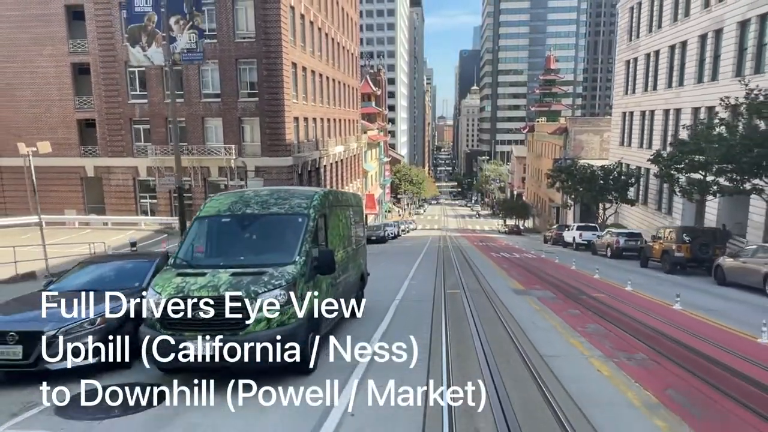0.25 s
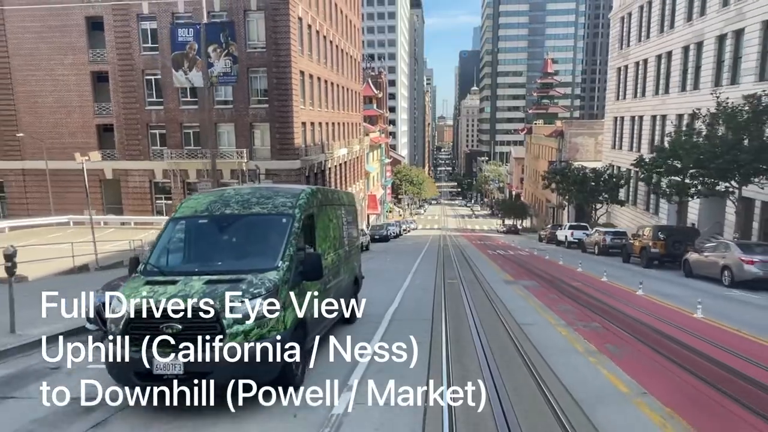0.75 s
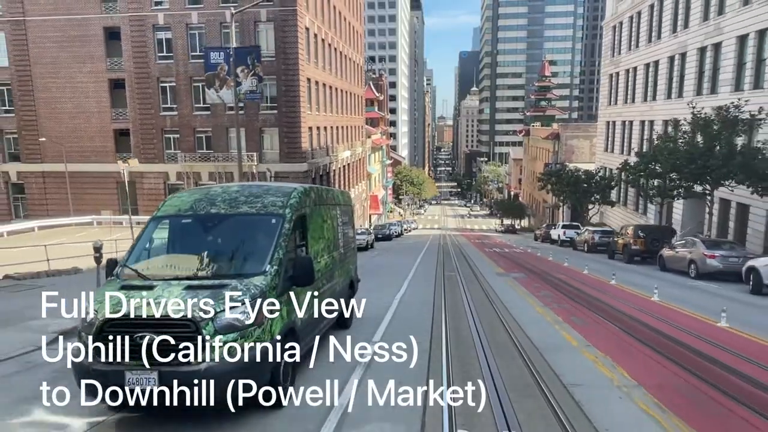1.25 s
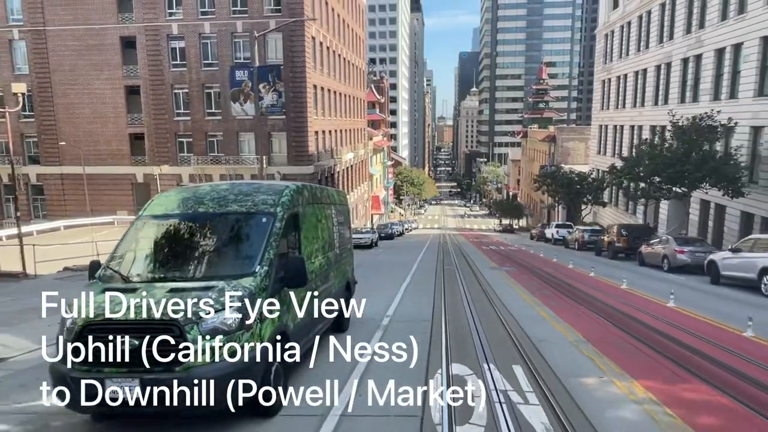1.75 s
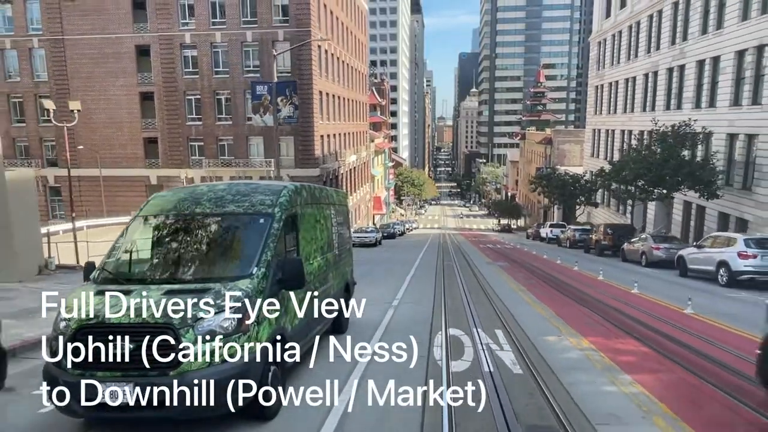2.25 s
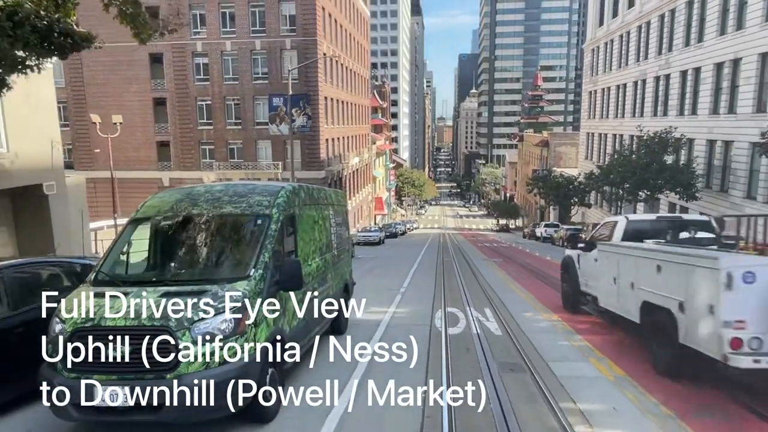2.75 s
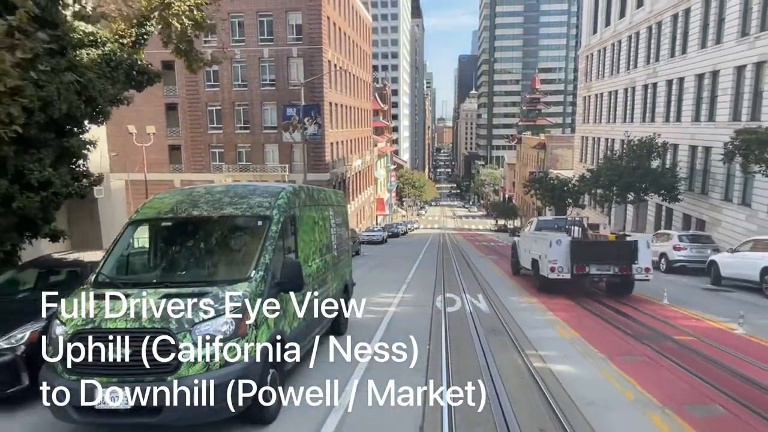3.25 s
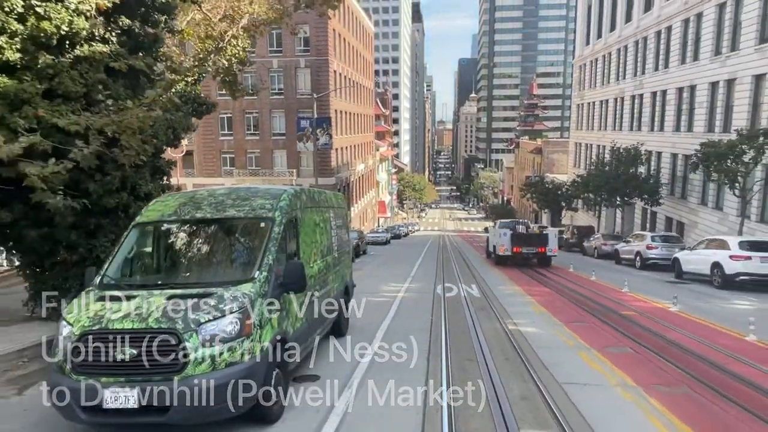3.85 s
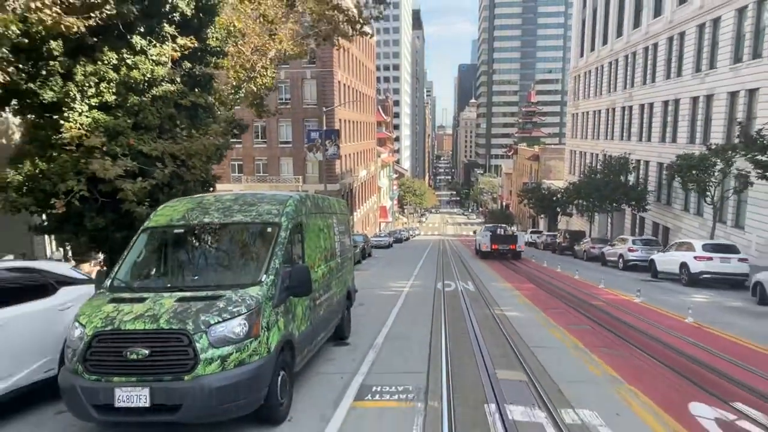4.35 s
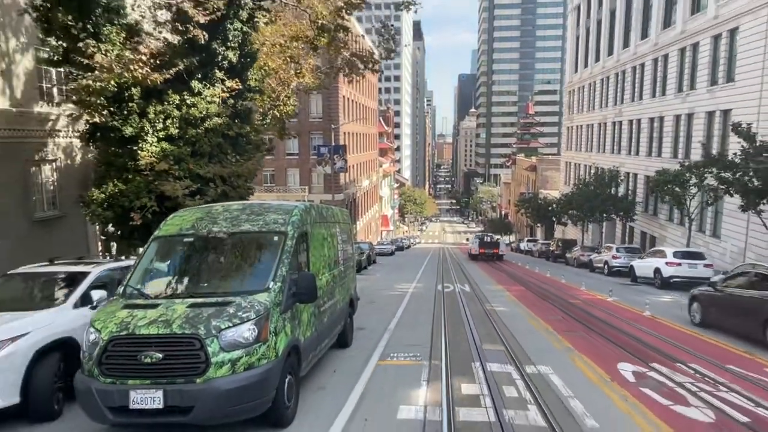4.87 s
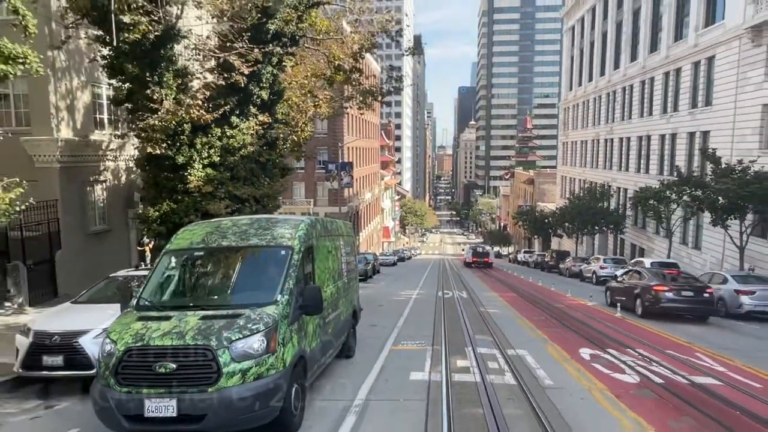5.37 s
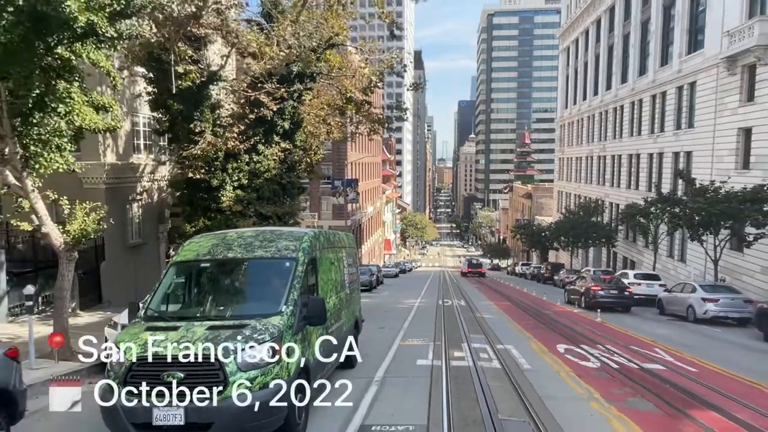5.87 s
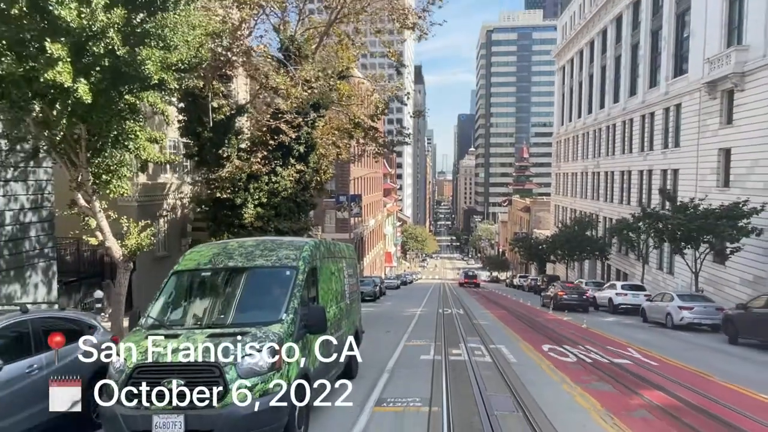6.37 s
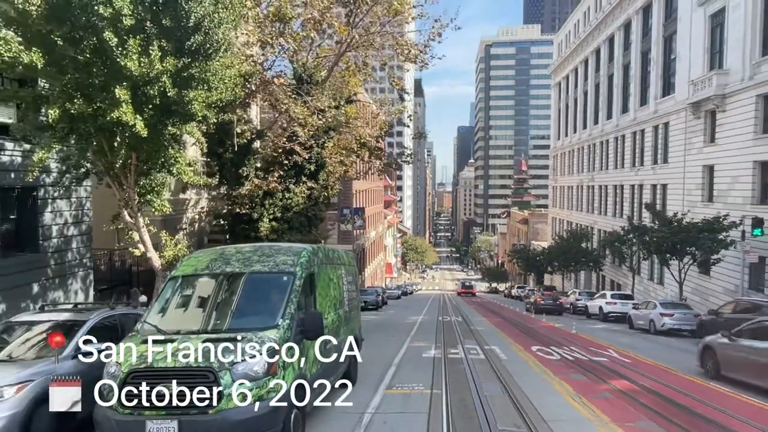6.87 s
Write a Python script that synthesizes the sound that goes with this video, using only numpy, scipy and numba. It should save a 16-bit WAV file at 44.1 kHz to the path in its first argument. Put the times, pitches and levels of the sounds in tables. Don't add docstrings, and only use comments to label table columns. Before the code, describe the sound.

Steel wheels hum and throb under a wooden rail car on a city street, wide stereo and close to the microphone. Deep rumble, rough midrange roar and hissing cable grind run continuously beneath jolting clanks. After a short low engine note, paired rail joints crash with ringing metal, first near the middle, then twice more. Finally the hum drops away, leaving dull booming, faint flange whine and a fade.

```python
import sys
import numpy as np
from scipy import signal
from scipy.fft import rfft, irfft
from scipy.io import wavfile
from scipy.ndimage import uniform_filter1d
from numba import njit

SR = 44100
rng = np.random.default_rng(int(sys.argv[2]) if len(sys.argv) > 2 else 0)


def int16_out(signal):
    q = np.round(np.clip(np.atleast_2d(signal).T, -1, 1) * 32767)
    wavfile.write(sys.argv[1], SR, q.astype(np.int16))


def voltage_ratio(level):
    return 10 ** (np.asarray(level, float) / 20)


N = 313992
T = np.arange(N) / SR

# time_s, drone_level_db, roughness_db
WHEEL_ON_RAIL = [(0, -6, -24), (0.08, -18.5, -31.5), (0.15, -11.5, -28.5), (0.36, -17, -25.5),
                 (0.61, -15, -24), (0.95, -19.5, -25.5), (1.5, -16.5, -23), (1.66, -16, -27.5),
                 (2.22, -19, -28.5), (2.42, -20, -26.5), (3.55, -16.5, -29), (3.98, -19, -25),
                 (4.26, -13, -35), (4.44, -22.5, -31), (4.6, -13, -35), (5.17, -21.5, -41.5),
                 (5.4, -20, -31), (7.12, -42, -40.5)]
# time_s, pitch_hz
DRONE_PITCH = [(0, 248), (0.7, 243), (1.0, 225), (1.4, 232), (1.8, 248), (2.4, 243), (2.8, 234), (3.2, 241),
               (3.8, 234), (4.9, 250), (5.25, 248), (5.6, 231), (7.12, 232)]
# time_s, pitch_hz, width_hz
BOOM_PITCH = [(0, 180.4, 103), (3.5, 164, 91.5), (4.3, 163.6, 60), (5.1, 148.7, 68.8), (5.4, 152, 40.8),
              (5.9, 176.5, 60), (6.5, 153.6, 35.9), (7.12, 152.3, 29.95)]
# time_s, pitch_hz, width_hz
FRAME_PITCH = [(0, 414.6, 87), (2.5, 400.6, 98.4), (5, 413, 126.4), (5.6, 353, 171), (7.12, 323, 164.4)]
# pitch_hz, level_db_per_hz
SUB_COLOUR = [(12, -52.5), (20, -25), (59, -2), (108, -2.5), (130, -6.5), (170, -26), (290, -120)]
# start_s, length_s, level_db, pitch_hz
DRONE_THROBS = [(-0.002, 0.023, -6, 244), (0.109, 0.064, -12, 251.7), (0.172, 0.082, -12.5, 229.4),
                (0.291, 0.041, -10, 220), (0.364, 0.1, -15, 248.6), (0.48, 0.06, -9, 252.7),
                (0.562, 0.11, -11, 249.4), (0.67, 0.09, -12.5, 239), (0.743, 0.029, -19, 277),
                (0.838, 0.055, -13.5, 239.5), (0.972, 0.04, -13, 215), (1.012, 0.092, -14, 226),
                (1.101, 0.049, -15, 233), (1.229, 0.029, -8.5, 235.7), (1.329, 0.072, -15.5, 225.2),
                (1.468, 0.044, -13.5, 251), (1.547, 0.036, -13.5, 228), (1.579, 0.24, -14.5, 250.1),
                (1.818, 0.097, -11, 250), (1.902, 0.088, -14, 260.6), (2.059, 0.058, -6.5, 244),
                (2.118, 0.027, -6.5, 230), (2.145, 0.102, -12, 245.1), (2.285, 0.031, -7.5, 234),
                (2.411, 0.05, -13.5, 233), (2.518, 0.052, -14.5, 228), (2.619, 0.04, -12.5, 254),
               (2.73, 0.051, -13, 229), (2.825, 0.038, -10.5, 223), (2.883, 0.037, -11, 236),
               (2.935, 0.065, -13.5, 240), (3.054, 0.06, -13.5, 226.5), (3.166, 0.049, -13.5, 235.6),
               (3.24, 0.064, -15, 249.4), (3.313, 0.015, -2.5, 231.4), (3.4, 0.016, -11.5, 234),
               (3.449, 0.048, -19, 245.3), (3.521, 0.033, -11.5, 213), (3.557, 0.048, -13, 222.4),
               (3.623, 0.027, -9.5, 256.7), (3.735, 0.036, -16, 208), (3.768, 0.033, -12, 222),
               (3.838, 0.064, -13.5, 234.5), (3.915, 0.027, -13, 227), (3.989, 0.014, -11.5, 234),
               (4.031, 0.022, -17.5, 229), (4.073, 0.027, -7, 233.6), (4.127, 0.06, -16, 241),
               (4.185, 0.16, -13, 244.2), (4.385, 0.046, -15, 259), (4.45, 0.04, -14, 228.3),
               (4.506, 0.184, -13, 245.4), (4.701, 0.018, -13.5, 250), (4.729, 0.028, -20.5, 259.3),
               (4.764, 0.069, -16, 252.3), (4.856, 0.06, -18.5, 260.3), (4.905, 0.09, -12, 251.6),
               (5.039, 0.05, -13.5, 249), (5.097, 0.066, -14.5, 243), (5.152, 0.07, -13, 250),
               (5.221, 0.032, -14.5, 243), (5.274, 0.032, -15, 253)]
# start_s, length_s, level_db, pitch_hz
FRAME_THROBS = [(0.248, 0.05, -16, 412), (0.614, 0.038, -14.5, 394), (3.989, 0.042, -16, 405)]
SLOWING_THROBS = [(5.448, 0.05, -19, 218.6), (5.542, 0.1, -24, 208), (5.64, 0.023, -22, 242),
                  (5.68, 0.039, -17.5, 229), (5.806, 0.026, -17.5, 191), (5.851, 0.062, -18, 214),
                  (5.918, 0.055, -21, 210), (5.943, 0.081, -25.5, 215.6)]
BOOM_THROBS = [(0.417, 0.025, -22, 151), (0.828, .09, -20.5, 141.7), (1.068, 0.11, -19, 184.6),
               (1.531, .05, -17, 133.3), (1.906, 0.065, -19, 135), (3.638, 0.032, -20.5, 152),
               (3.676, .09, -19.5, 169), (3.887, 0.04, -18, 124), (5.254, .085, -22.5, 139.5),
               (5.434, 0.027, -25, 150.4), (5.647, 0.059, -20.5, 149.6), (5.845, .045, -23.5, 178),
               (5.907, 0.077, -23.5, 163.8), (5.998, 0.04, -16.5, 162.2), (6.086, .085, -18.5, 172),
               (6.204, .14, -22, 156.6), (6.362, 0.029, -20.5, 169.6), (6.433, 0.15, -30, 141),
               (6.573, .045, -21, 157), (6.645, .055, -27, 156.4), (6.783, .075, -22, 149)]
# time_s, level_db
ROAR_SWELL = [(0.0, -29), (0.48, -28.5), (0.89, -34.5), (1.76, -29), (2.28, -30.5), (2.72, -30),
              (2.97, -30.5), (3.88, -32), (4.2, -31), (4.6, -32), (4.96, -33), (5.49, -37), (6.11, -37),
              (6.35, -41), (6.7, -42), (7.12, -43)]
# pitch_hz, level_db_per_hz
ROAR_COLOUR = [(150, -18.5), (260, -6.5), (315, -10), (402, -23.5), (457, -9.5), (560, -14.5), (778, -13.5),
               (866, -19), (943, -14), (1120, -21.5), (1660, -20.5), (2260, -28), (2800, -38.5),
               (3310, -45.5), (4300, -84), (7280, -120)]
GRIND_COLOUR = [(2600, 1), (3200, -5), (3700, -5), (4300, -7.5), (5000, -10.5), (5700, -12.5),
                (6400, -12.5), (7100, -19), (8200, -25), (9600, -22.5), (10500, -37), (12200, -45.5),
                (13500, -42), (15500, -44)]
# pitch_hz, width_hz, level_db
WHINE_NOTES = [(1386, 42, -4.5), (1750, 76, -0.5)]
# time_s, level_db
WHINE_LEVEL = [(0, -59.5), (5.5, -63.5), (5.9, -50), (6.2, -65), (6.35, -51.5), (6.8, -53.5), (6.87, -62),
               (6.95, -52), (7.12, -49)]
# pitch_hz, width_hz, level_db
GRIP_NOTES = [(2225, 170, 3), (5030, 90, -13), (6280, 540, -14), (11700, 700, -42)]
# time_s, level_db
GRIP_BITE = [(0, -54), (2.4, -52), (2.6, -44.5), (3, -48.5), (3.4, -44), (3.7, -47), (4.5, -54.5),
             (7.12, -71.5)]
# pitch_hz, width_hz, level_over_roar_db
PULLEY_NOTES = [(11900, 30, -56.5), (12245, 20, -52.5)]
# pitch_hz, level_db_per_hz
STREET_COLOUR = [(3000, -2.5), (6000, -1), (9000, 0.5), (12000, -9.5), (13000, -12), (13600, -5.5)]
# start_s, treble_db, mids_over_treble_db, thud_db
JOLTS = [(0.4, -32.5, -4, -30.5), (0.428, -23, 9.5, -11), (0.603, -31.5, 15, -34),
         (0.785, -28.5, 16, -10.5), (0.825, -31, 10, -25.5), (0.979, -41, 12.5, -20.5),
         (1.035, -34.5, 16, -28.5), (0.12, -45.5, 16, -33.5), (0.285, -45.5, 10.5, -32.5),
         (0.69, -33.5, 12.5, -28), (1.72, -40, 8.5, -29.5), (2.49, -37, 14, -38),
         (2.554, -35.5, 16.5, -33.5), (1.195, -28, 14.5, -18), (1.308, -34, -4, -17.5),
         (1.541, -28.5, 13, -10.5), (1.606, -28, 7, -19.5), (1.83, -29.5, 11.5, -31),
         (1.9036, -27.5, 15, -11), (1.957, -27, 5, -13), (2.09, -29, 9.5, -31.5), (2.191, -27.5, 12.5, -32),
         (2.343, -30, -6.5, -27.5), (3.1003, -33, 7.5, -40.5), (3.151, -33, 10.5, -29.5),
         (3.2185, -29, 10.5, -22), (3.468, -24, 11, -15), (3.5873, -24.5, 11.5, -10),
         (3.928, -28, 12, -10.5), (4.081, -35, 15, -25.5), (4.183, -34.5, 11.5, -16),
         (4.3, -42.5, 5, -20.5), (4.659, -39.5, 13, -28.5), (4.78, -49, 7.5, -21.5),
         (4.904, -24.5, 6.5, -14.5), (5.0788, -38.5, 7, -44), (5.2495, -37, 16, -15), (5.288, -37, 15, -18),
         (5.879, -47, 20.5, -27.5), (6.86, -56, 2.5, -21), (7.012, -38, 1.5, -30)]
# pitch_hz, level_db_per_hz
RATTLE_COLOUR = [(2600, 1.5), (3200, -3.5), (3700, -5.5), (4300, -9.5), (5000, -12.5), (5700, -11),
                 (6400, -9.5), (7100, -17), (8200, -20.5), (9600, -18.5), (10500, -31.5), (12200, -34.5),
                 (13500, -51), (15500, -38.5)]
# start_s, level_db, pitch_hz, t60_s
IRON_KNOCKS = [(1.2, -29, 2134, 0.13), (1.32, -28.5, 2050, 0.15), (4.08, -39, 5510, 0.053),
               (4.103, -41.5, 5040, .08), (4.377, -31.5, 2206, 0.12), (5.087, -33, 2140, 0.061),
               (4.272, -17, 468, 0.081), (4.984, -10, 468, 0.11), (2.75, -30.5, 4520, 0.086),
               (2.893, -32, 2080, 0.09), (5.868, -37.5, 1446, .12), (5.885, -33, 1465, 0.13),
               (5.995, -41, 1455, 0.086), (6.035, -35, 1420, 0.09), (6.132, -34, 1504, 0.071),
               (6.277, -34, 1520, 0.11), (6.972, -33.5, 1085, 0.11), (2.672, -24.5, 2830, .1),
               (2.726, -12.5, 1930, 0.099), (2.728, -17.5, 2994, 0.087), (2.731, -35, 4200, 0.082),
               (2.848, -23.5, 2736, 0.15), (2.847, -21.5, 2410, 0.12), (3.468, -20, 2130, 0.07),
               (4.197, -21, 2794, 0.1), (4.272, -26.5, 4150, .08), (4.275, -46.5, 14800, .5),
               (2.728, -54.5, 14650, .35), (4.987, -55, 14750, .4), (4.275, -17.5, 2760, 0.13),
               (4.99, -53, 15870, 0.28), (2.726, -58, 15530, .1), (4.265, -23.5, 2106, 0.17),
               (4.276, -36.5, 1960, 0.081), (4.409, -46, 7483, 0.21), (4.41, -47.5, 8500, .3),
               (4.91, -22, 2915, .12), (4.984, -20.5, 2090, 0.13), (4.986, -17.5, 2770, 0.085),
               (6.76, -57, 5170, 0.2)]
# start_s, level_db, pitch_hz
FITTING_TICKS = [(2.451, -37, 5060), (2.504, -36, 5230), (2.5714, -35, 5190), (2.6188, -38.5, 5030),
                 (2.6522, -32, 5160), (3.423, -35.5, 5100), (3.47, -29, 5030), (3.548, -35.5, 5070)]
# time_s, pitch_hz, level_db
TRUCK_NOTE = [
    (2.05, 65.6, -37),
    (2.112, 70, -28.5),
    (2.154, 72.2, -26),
    (2.292, 79.4, -23.5),
    (2.55, 82.4, -30.5),
]
# time_s, pitch_hz, level_db
SLIP_NOTE = [(2.43, 5200, -72), (2.5, 5110, -45.5), (2.67, 5140, -48), (2.74, 5120, -57), (2.95, 5030, -52),
             (3.2, 5150, -79), (3.45, 5040, -53), (3.62, 5040, -78)]
# start_s, treble_db, mids_over_treble_db, ring_over_treble_db, t60_s
RAIL_JOINTS = [(2.666, -28.5, 4, -19, 0.35), (2.7256, -13, 4, -18.5, 0.086),
               (2.843, -29.5, 11, -22.5, 0.15), (2.745, -25, 5.5, -22.5, 0.08),
               (2.865, -39.5, 9.5, -20, 0.27), (2.893, -39.5, 10, -25, 0.089), (4.192, -28, 4, -14.5, 0.28),
               (4.206, -27.5, 7.5, -19, 0.22), (4.2712, -13, 1.5, -4.5, 0.11),
               (4.305, -27, 6.5, -18.5, 0.09), (4.327, -33, 2, -19.5, .15), (4.887, -40, 8.5, -21, 0.11),
               (4.906, -25, 6.5, -10.5, 0.2), (4.983, -11.5, 1.5, -12.5, 0.11)]
# pitch_hz, level_db_per_hz
CRASH_MID_COLOUR = [(190, -36.5), (330, -11.5), (363, -11), (577, 1), (849, -6), (982, -0.5), (1100, -7.5),
                    (1560, -5.5), (1770, -9.5), (2250, -5.5), (2530, -10.5), (2810, -10), (3310, -33.5),
                    (4300, -40), (7280, -120)]
CRASH_TOP_COLOUR = [(2600, -5.5), (3200, -0.5), (3700, -2), (4300, -5), (5000, -9), (5700, -12),
                    (6400, -9.5), (7100, -13), (8200, -15.5), (9600, -16), (10500, -29.5), (12200, -34),
                    (13500, -43), (15500, -35)]
# pitch_hz, level_db, t60_s
STEEL_MODES = [(627, 6, .2), (970, 3, .22), (2190, 2, .3), (2750, 5, .2), (6450, -8, .2), (7483, -16, .4),
               (8430, -13, .4), (9635, -11, .4), (10790, -19, .35), (11230, -26, .3), (11750, -27, .35),
               (11930, -25, .35), (12580, -28, .35), (13500, -26, .2)]
# time_s, pitch_hz, level_db
FLANGE_NOTE = [(5.3, 3340, -77), (5.7, 3486, -73), (6.07, 3550, -66), (6.25, 3440, -73),
               (6.32, 3400, -64.5), (6.45, 3470, -63), (6.65, 3380, -67), (6.8, 3430, -61.5),
               (6.87, 3460, -79), (6.95, 3500, -61), (7.12, 3510, -61)]
# pitch_hz, likeness (-1 to 1), left_minus_right_db, left_lead_rad
MIC_PORTS = [(40, .95, -2, 0), (110, .92, -2.3, 0), (190, .9, 0, .4), (260, .96, -.3, .25),
             (310, .55, -3, .3), (390, .75, 0, .5), (650, .25, -.4, 3), (1200, .35, -1, 3.6),
             (2400, .4, 0, 7), (4400, .38, -1.2, 11), (6400, .5, 5, 11.5), (9300, .45, -5, 15),
             (10800, .85, -2, 12.8), (12400, .9, 0, 12.3), (13600, .98, 0, 9.5)]


def noise():
    return rng.standard_normal((2, N))


def unit(x):
    return x / np.sqrt(np.mean(x ** 2))


def on_log_hz(table, size=N):
    hz, *columns = np.transpose(table)
    bins = np.log(np.arange(size // 2 + 1) * SR / size + 1)
    return [np.interp(bins, np.log(hz), c) for c in columns]


def colour(x, spectrum, ragged_db=0., mode_hz=35):
    below = (spectrum[0][0] / 2, spectrum[0][1] - 30)
    above = (spectrum[-1][0] * 1.1, -130)
    k = int(mode_hz * N / SR)
    modes = rng.standard_normal((2, N // 2 + 1))
    modes = unit(uniform_filter1d(uniform_filter1d(modes, k), k))
    gain = voltage_ratio(on_log_hz([below] + list(spectrum) + [above])[0] + ragged_db * modes)
    return irfft(rfft(x) * gain / np.sqrt(np.mean(gain ** 2)), N)


def curves(table):
    s, *columns = np.transpose(table)
    return [np.interp(T, s, c) for c in columns]


@njit
def svf(x, hz, width):
    y = np.empty_like(x)
    for c in range(len(x)):
        band, low = 0., 0.
        for i in range(x.shape[1]):
            g = np.tan(np.pi * hz[i] / SR)
            k = width[i] / hz[i]
            v = (band + g * (x[c, i] - low)) / (1 + g * (g + k))
            band = 2 * v - band
            low += 2 * g * v
            y[c, i] = k * v
    return y


def resonance(x, hz, width_hz):
    hz, width_hz = hz + np.zeros(N), width_hz + np.zeros(N)
    return unit(svf(svf(x, hz, width_hz), hz, width_hz) / np.sqrt(width_hz))


def ring(x, hz, t60):
    pole = np.exp(2j * np.pi * hz / SR - np.log(1000) / (t60 * SR))
    return signal.lfilter([1], [1, -pole], x).imag


def walk(rate):
    k = int(SR / rate)
    held = np.repeat(rng.standard_normal(N // k + 1), k)
    return unit(uniform_filter1d(uniform_filter1d(held, k), k)[:N])


def blows(s, db, rise, t60):
    power = np.zeros(N)
    for s0, db0, rise0, t0 in np.broadcast(s, db, rise, t60):
        start = int((s0 - rise0 / 2) * SR)
        age = T[:min(SR // 2, N - start)]
        swell = (1 - np.exp(-2 * age / max(rise0, 1e-3))) ** 2
        power[start:start + len(age)] += (swell * voltage_ratio(db0 - 60 * age / max(t0, .02))) ** 2
    return np.sqrt(power)


def patchy(x, patch_db):
    spec = signal.stft(x, nperseg=512)[2]
    across, along = int(250 * 512 / SR), int(.06 * SR / 256)
    field = uniform_filter1d(rng.standard_normal(spec.shape[1:]), across, axis=0)
    field = uniform_filter1d(uniform_filter1d(field, along, axis=1), along, axis=1)
    return signal.istft(spec * voltage_ratio(patch_db * unit(field)), nperseg=512)[1][:, :N]


def body():
    drone_db, rough_db = curves(WHEEL_ON_RAIL)
    rough_db = rough_db + 28
    slow = np.interp(T, [5.7, 5.9], [0, 1])
    fade = np.interp(T, [6.8, N / SR], [0, 1])

    drone_width_hz = np.clip(36 - 1.3 * rough_db + 13 * slow, 12, 60)
    between_throbs_db = -4.5 * (1 - slow)
    drone = resonance(noise(), curves(DRONE_PITCH)[0], drone_width_hz) * voltage_ratio(drone_db + between_throbs_db)

    s, _, _, thud_db = np.transpose(JOLTS)
    jolts = blows(s, thud_db - 7.5, 0.082, 0.48)
    boom_db = -26 + 0.85 * rough_db * (1 - 0.57 * slow) + 3 * slow - 22 * fade
    boom = resonance(noise(), *curves(BOOM_PITCH)) * np.hypot(voltage_ratio(boom_db), jolts)

    frame = resonance(noise(), *curves(FRAME_PITCH)) * voltage_ratio(-28 + 0.77 * rough_db)
    sub = colour(noise(), SUB_COLOUR) * voltage_ratio(-32.5 + 0.89 * rough_db + 4 * slow)
    return drone + boom + frame + sub


def throbs():
    edge_s, blur_rad, trim_db = 0.017, 0.0028, -2
    out = np.zeros((2, 2 * N))
    for s, length, db, hz in DRONE_THROBS + FRAME_THROBS + SLOWING_THROBS + BOOM_THROBS:
        age = T[:int(length * SR)]
        to_edge = np.minimum(age, age[-1] - age)
        swell = np.sin(np.pi / 2 * np.clip(to_edge / edge_s, 0, 1))
        blur = np.cumsum(rng.standard_normal((2, SR // 2)), axis=1)[:, :len(age)]
        turn = 2 * np.pi * (hz * age + rng.random((2, 1))) + blur_rad * blur
        start = SR + int(s * SR)
        out[:, start:start + len(age)] += np.sqrt(2) * voltage_ratio(db + trim_db) * swell * np.sin(turn)
    return out[:, SR:SR + N]


def rolling():
    roar_db, bite_db = curves(ROAR_SWELL)[0], curves(GRIP_BITE)[0]
    grind_db = -48.5 + 0.32 * (bite_db + 55) + 0.27 * (roar_db + 31)
    shake_db, flicker = .8 * walk(14), walk(35)
    roar = patchy(colour(noise(), ROAR_COLOUR, ragged_db=1.5), patch_db=2.2)
    grind = patchy(colour(noise(), GRIND_COLOUR, ragged_db=1.0), patch_db=1.8)
    roar = roar * voltage_ratio(roar_db + 3.5 + shake_db + .7 * flicker)
    return roar + grind * voltage_ratio(grind_db + shake_db + 0.5 * flicker)


def fluttering(notes, flutter_db, rate):
    return sum(voltage_ratio(db + flutter_db * walk(rate)) * resonance(noise(), hz, width) for hz, width, db in notes)


def whine():
    return fluttering(WHINE_NOTES, 1.9, 11) * voltage_ratio(curves(WHINE_LEVEL)[0])


def grip():
    return fluttering(GRIP_NOTES, 2.5, 22) * voltage_ratio(curves(GRIP_BITE)[0])


def pulley():
    notes = sum(voltage_ratio(db) * resonance(noise(), hz, width) for hz, width, db in PULLEY_NOTES)
    return notes * voltage_ratio(curves(ROAR_SWELL)[0])


def street():
    return colour(noise(), STREET_COLOUR) * voltage_ratio(-78 + 1.2 * walk(3))


def rattles():
    s, db, mid_db, thud_db = np.transpose(JOLTS)
    rise, t60 = 0.024, 0.33
    chatter = voltage_ratio(1.8 * walk(150))
    top = colour(noise() * chatter, RATTLE_COLOUR, ragged_db=5.0) * blows(s, db - 5.0, rise, t60)
    mid = colour(noise() * chatter, ROAR_COLOUR, ragged_db=1.2)
    mid = mid * blows(s, db + mid_db, 2.0 * rise, 1.16 * t60)
    thud = resonance(noise(), 95, 150) * blows(s, thud_db - 5.5, 1.2 * rise, 1.86 * t60)
    return top + mid + thud


def struck_iron():
    blur_rad = .03
    out = np.zeros((2, N + SR))
    age = np.arange(SR // 4) / SR
    fitting = [(s, db + 0.5, hz, 0.053) for s, db, hz in FITTING_TICKS]
    for s, db, hz, t60 in fitting + IRON_KNOCKS:
        turn = 2 * np.pi * hz * age + blur_rad * np.cumsum(rng.standard_normal(len(age)))
        envelope = voltage_ratio(db - 60 * age / t60) * np.minimum(age / 0.0017, 1)
        start = int(s * SR)
        out[:, start:start + len(age)] += envelope * np.sin(turn)
    return out[:, :N]


def truck():
    hz, db = curves(TRUCK_NOTE)
    first_s, last_s = TRUCK_NOTE[0][0], TRUCK_NOTE[-1][0]
    near = np.interp(T, [first_s - .04, first_s, last_s, last_s + .06], [0, 1, 1, 0])
    note = np.sqrt(2) * voltage_ratio(db) * near * np.sin(2 * np.pi * np.cumsum(hz) / SR)
    return np.array([note, 0 * note])


def squeal():
    hz, db = curves(SLIP_NOTE)
    slipping = (T > SLIP_NOTE[0][0]) * (T < SLIP_NOTE[-1][0])
    return resonance(noise(), hz, 55) * voltage_ratio(db + 2.5 * walk(30)) * slipping


def joints():
    s, db, mid_db, ring_db, t60 = np.transpose(RAIL_JOINTS)
    rise = 0.011
    top_level = blows(s, db - 2.0, rise, t60)
    top_echo = blows(s + 0.029, db - 18.5, 0.077, 0.52)
    top = colour(noise(), CRASH_TOP_COLOUR, ragged_db=1.2, mode_hz=60) * (top_level + top_echo)

    mid_level = blows(s, db + mid_db + 0.5, rise, 1.45 * t60)
    mid_echo = blows(s + 0.0047, db + mid_db - 18.5, 0.01, 0.86)
    mid = patchy(colour(noise(), CRASH_MID_COLOUR, ragged_db=1.2, mode_hz=60), patch_db=2.5)
    mid = mid * (mid_level + mid_echo)

    strike = blows(s, db + ring_db - 22.0, rise, 0.35 * t60)
    steel = sum(voltage_ratio(mode_db) * ring(noise() * strike, hz, mode_t60) for hz, mode_db, mode_t60 in STEEL_MODES)
    grain = voltage_ratio(2.2 * walk(350) - .5)
    return (top + mid) * grain + steel


def flange():
    hz, db = curves(FLANGE_NOTE)
    turn = np.cumsum(2 * np.pi * hz / SR + .008 * noise()[0])
    paths = np.array([[0], [1.7]])
    return np.sqrt(2) * np.sin(turn) * voltage_ratio(db + 1.3 * walk(27)) * paths


def scene():
    car = body() + throbs() + rolling() + whine() + grip() + pulley()
    passing = street() + rattles() + struck_iron() + truck()
    return car + passing + squeal() + joints() + flange()


def roll_off(x):
    return signal.sosfilt(signal.butter(12, 15900, fs=SR, output="sos"), x)


def record(dry):
    like, pan_db, lead = on_log_hz(MIC_PORTS, size=2 * N)
    common, apart = rfft(dry, 2 * N)
    angle = np.arccos(np.clip(like, -1, 1)) / 2
    lean = voltage_ratio(pan_db / 2) * np.exp(.5j * lead)
    left = (np.cos(angle) * common + np.sin(angle) * apart) * lean
    right = (np.cos(angle) * common - np.sin(angle) * apart) / lean
    fade_in = np.minimum(T / .004, 1)
    ports = voltage_ratio(2.0) * irfft(np.array([left, right]))[:, :N] * fade_in
    rounded = ports / (1 + np.abs(ports) ** 4) ** .25
    return roll_off(rounded)


dry = scene()
out = record(dry)
int16_out(out)
```